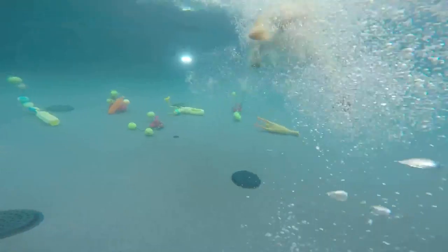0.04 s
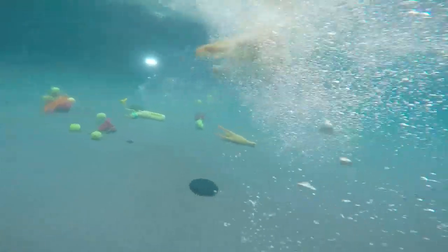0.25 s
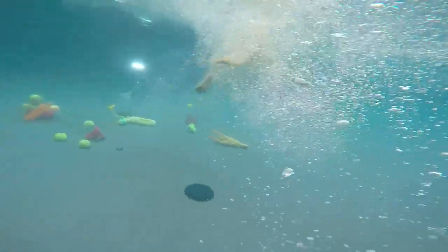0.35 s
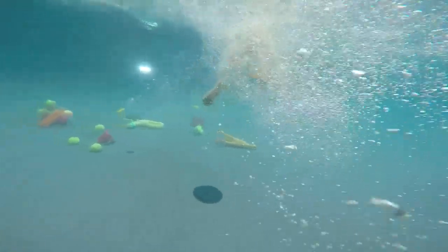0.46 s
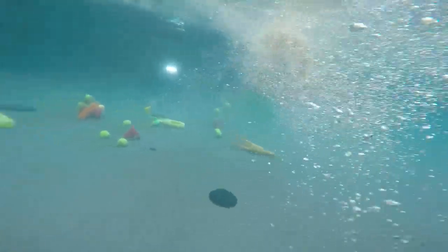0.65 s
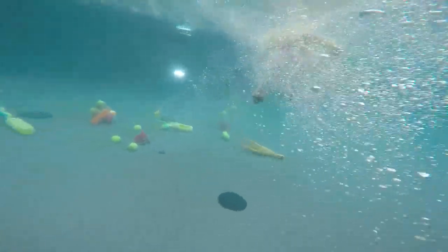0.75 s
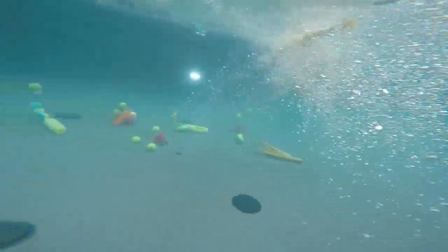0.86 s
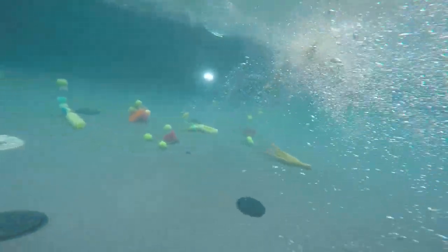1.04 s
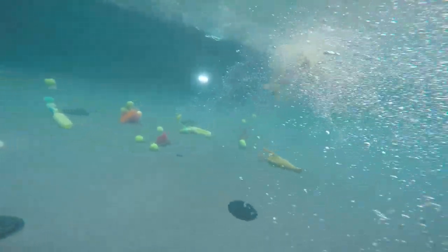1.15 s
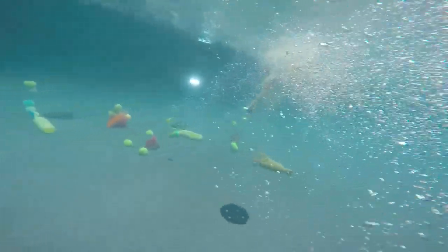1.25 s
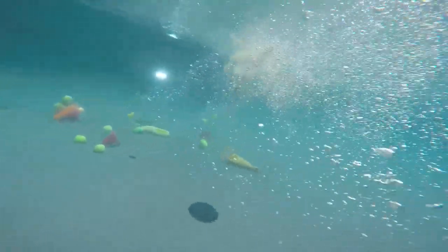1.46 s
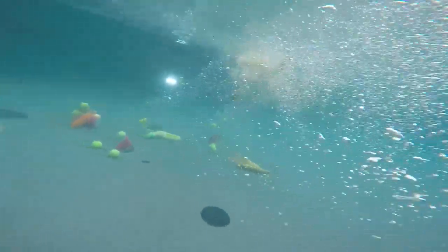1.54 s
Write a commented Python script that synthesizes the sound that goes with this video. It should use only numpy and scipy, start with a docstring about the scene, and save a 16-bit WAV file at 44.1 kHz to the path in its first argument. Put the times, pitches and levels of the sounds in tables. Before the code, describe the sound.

After a brief silence, two or three heavy bass thuds hit close to a submerged camera with a short crackle of spray, then drop away to faint gurgling bubbles, thin hiss and low water rumble in a pool.

```python
"""A dog plunges into a swimming pool, heard by a camera under water.
Air pockets heave with deep thumps, sinking sines, and surges knock on the camera housing as damped sines.
Spits of spray crack as short noise bursts, and single bubbles ring as wobbling sines with pool echoes.
Random pops, hiss and a swarm of rings, coloured by the housing, make the cloud's wash and fizz.
Slow currents rumble on the housing as low coloured noise."""
import sys
import numpy as np
from scipy import signal
from scipy.io import wavfile
from scipy.ndimage import uniform_filter1d

SR = 44100
rng = np.random.default_rng(int(sys.argv[2]) if len(sys.argv) > 2 else 0)


def unload_wav(signal):
    """Save mono or channel-first audio to the path in sys.argv[1] as 16-bit WAV at rate SR, clipped to [-1, 1]."""
    wavfile.write(
        sys.argv[1],
        SR,
        np.round(np.clip(np.atleast_2d(signal).T, -1, 1) * 32767).astype(np.int16),
    )


N = 70560  # 1.6 s

# colour of the bubble cloud heard through the resonant housing: pitch_hz, relative density_db [dB per Hz]
CLOUD_COLOUR = [(100, -19), (200, -8), (300, -4.5), (450, -3.5), (590, 2), (690, -6), (800, -13.5),
                (920, -13.5), (1050, -12), (1230, -7.5), (1400, -22), (1570, -12.5), (1680, -14),
                (1830, -8), (2050, -21.5), (2480, -17.5), (2750, -23.5), (3220, -19), (3550, -26),
                (3780, -23), (4000, -14.5), (4400, -15.5), (4580, -21.5), (4950, -22), (5700, -29.5),
                (7000, -34), (8300, -34.5), (12000, -41), (15000, -45)]


def gain_of(db):
    """Decibels to gain."""
    return 10 ** (np.asarray(db) / 20)


def evened(x):
    """Scales to unit rms."""
    return x / np.sqrt(np.mean(x ** 2) + 1e-20)


def add(mix, start_s, sound):
    """Mixes a sound in at its start time, cut at the end of the scene."""
    part = mix[max(round(start_s * SR), 0):][:len(sound)]
    part += sound[:len(part)]


def level(points):
    """Gain along a level curve, silent until the sound cuts in, opening within a millisecond."""
    cut_in_s, rise_s = 0.0899, 0.001
    t = np.arange(N) / SR
    times_s, levels_db = np.transpose(points)
    opening = np.clip((t - cut_in_s) / rise_s, 0, 1)
    return gain_of(np.interp(t, times_s, levels_db)) * opening


def colour(x, points):
    """Causal minimum-phase filter with the given spectrum, so that clicks ring in its peaks."""
    points_hz, points_db = np.transpose(points)
    bins_hz = abs(np.fft.fftfreq(N, 1 / SR)) + 1  # 1 Hz up, to keep the logarithm finite
    log_gain = np.log(gain_of(np.interp(np.log(bins_hz), np.log(points_hz), points_db)))
    response = np.exp(np.conj(signal.hilbert(log_gain)))
    return np.fft.ifft(np.fft.fft(x) * response).real


def pool(x):
    """Adds a short scatter of decaying echoes from the surface and floor."""
    echo_db, t60_s, echoes_per_s = -9.5, 0.12, 2000
    t = np.arange(SR // 4) / SR
    strikes = rng.standard_normal(len(t)) * (rng.random(len(t)) < echoes_per_s / SR)
    taps = strikes * gain_of(-60 * t / t60_s)
    echoes = signal.fftconvolve(x, taps / np.linalg.norm(taps))[:N]
    return x + gain_of(echo_db) * echoes


def currents():
    """Stirred water pushes slowly on the housing: low noise, evened over about 90 ms."""
    # spectrum of the push: pitch_hz, relative density_db [dB per Hz]
    rumble_colour = [(8, -5), (22, 10), (36, 2), (60, -3.5), (100, -9.5), (170, -19.5), (400, -46.5)]
    # strength of the push: time_s, rms level_db
    rumble_level = [(.09, -51), (.3, -49.5), (.4, -58.5), (.55, -54.5), (.68, -53.5), (.76, -53),
                    (.82, -51.5), (.9, -55), (1.03, -54.5), (1.11, -47), (1.17, -54.5), (1.36, -51),
                    (1.45, -50), (1.6, -48.5)]
    push = colour(rng.standard_normal(N), rumble_colour)
    push /= np.sqrt(uniform_filter1d(push ** 2, size=4000))
    return push * level(rumble_level)


def swarm():
    """Many bubbles of random size, each ringing for a few cycles through the housing."""
    count, low_hz, high_hz = 400, 300, 3400
    decay_cycles, spread_db = 6.7, 4.5
    out, t = np.zeros(N), np.arange(SR // 12) / SR
    for when, size, strength in rng.random((count, 3)):
        hz = low_hz * (high_hz / low_hz) ** size
        shape = (1 - np.exp(-hz * t)) * np.exp(-hz * t / decay_cycles)
        ring = shape * np.sin(2 * np.pi * hz * t)
        add(out, when * N / SR, hz * gain_of(spread_db * strength ** 2) * ring)
    return evened(colour(out, CLOUD_COLOUR))


def pops(per_s, spread_db, share):
    """Random pops of uneven size over the hiss of countless smaller ones; share is the pops' power."""
    sizes = gain_of(spread_db * np.minimum(rng.exponential(1, N), 4)) * rng.choice([-1, 1], N)
    near = evened(sizes * (rng.random(N) < per_s / SR))
    hiss = rng.standard_normal(N)
    return np.sqrt(share) * near + np.sqrt(1 - share) * hiss


def cloud():
    """The bubble cloud: a muffled wash with the swarm in it, and a treble fizz with pool echoes."""
    # strength of the wash: time_s, level_db
    wash_level = [(.09, -41), (.12, -43), (.17, -49), (.25, -47), (.32, -54), (.42, -55.5), (.6, -58),
                  (.7, -50.5), (.8, -56), (.92, -55.5), (1.02, -56.5), (1.3, -56.5), (1.6, -55)]
    # strength of the treble fizz: time_s, level_db
    fizz_level = [(.09, -54.5), (.16, -58.5), (.25, -59.5), (.32, -62.5), (.5, -64.5), (.7, -61), (.9, -62),
                  (1.2, -62), (1.6, -61)]
    split_hz, swarm_db = 1846, -2.5  # swarm level is relative to the popping wash
    low = signal.butter(4, split_hz, "low", fs=SR, output="sos")
    high = signal.butter(4, split_hz, "high", fs=SR, output="sos")
    wash = signal.sosfilt(low, colour(pops(per_s=820, spread_db=5, share=0.47), CLOUD_COLOUR))
    fizz = signal.sosfilt(high, colour(pops(per_s=2900, spread_db=9.5, share=0.2), CLOUD_COLOUR))
    wash = evened(wash) + gain_of(swarm_db) * swarm()
    return evened(wash) * level(wash_level) + evened(pool(fizz)) * level(fizz_level)


def bubble(hz, level_db, t60_s):
    """A bubble pinches off, holds and rings out, wobbling and rising slightly in pitch."""
    rise_s, hold_share = 0.0036, 0.092  # hold, rise included, as a share of t60
    glide_per_s = 0.45  # pitch rise as a share of the starting pitch
    wobble_depth, wobble_share = 0.22, 0.07  # wobble bandwidth as a share of the pitch
    t = np.arange(SR // 4) / SR
    fade_db = 60 * np.maximum(t / t60_s - hold_share, 0)
    shape = np.minimum(t / rise_s, 1) * gain_of(level_db - fade_db)
    smooth = signal.butter(2, np.clip(wobble_share * hz, 5, 2000), fs=SR, output="sos")
    wobble = evened(signal.sosfilt(smooth, rng.standard_normal((2, len(t)))))
    in_phase, sideways = wobble_depth * wobble
    turn = 2 * np.pi * hz * (t + glide_per_s * t ** 2 / 2)
    ring = (1 + in_phase) * np.sin(turn) + sideways * np.cos(turn)
    return shape * ring / np.sqrt(1 + 2 * wobble_depth ** 2)


def bubbles():
    """Single bubbles ring out in the pool, with echoes from its surface and floor."""
    # bubbles pinching off: start_s, starting pitch_hz, level_db before echoes, t60_s of the fade after the hold
    bubble_rows = [(.098, 1186, -43, 0.081), (.147, 1112, -41.5, .04), (.173, 615, -42, 0.11),
                   (.212, 1210, -44, 0.048), (.282, 1234, -47, 0.051), (.312, 686, -47, .07),
                   (.385, 601, -43, 0.037), (.530, 2613, -54.5, 0.032), (.574, 345, -45.5, 0.065),
                   (.645, 552.5, -39, 0.053), (.645, 1243, -45, 0.063), (.678, 2850, -44.5, 0.022),
                   (.681, 2465, -48, .03), (.690, 589, -38, 0.073), (.701, 1940, -45, 0.03),
                   (.718, 578, -41.5, 0.055), (.725, 737, -37.5, 0.027), (.778, 2200, -50.5, 0.029),
                   (.778, 1187, -45.5, 0.027), (.788, 586, -38.5, 0.057), (.800, 1570, -50.5, 0.064),
                   (.852, 1027, -48.5, 0.063), (.874, 1142, -49, 0.062), (.893, 1186, -45.5, 0.053),
                   (.897, 584, -47, 0.057), (.958, 1830, -51.5, 0.039), (1.044, 237, -46, 0.14),
                   (1.117, 390, -47.5, .06), (1.15, 416, -47.5, 0.047), (1.211, 648, -48, 0.043),
                   (1.212, 1735, -50.5, 0.041), (1.266, 522, -40.5, 0.038), (1.295, 1196, -48, 0.044),
                   (1.384, 569, -48.5, 0.036), (1.489, 404, -47.5, 0.064), (1.495, 1847, -54, 0.05),
                   (1.547, 1180, -47.5, 0.027), (1.594, 560, -42, .05)]
    rings = np.zeros(N)
    for start_s, hz, level_db, t60_s in bubble_rows:
        add(rings, start_s, bubble(hz, level_db, t60_s))
    return pool(rings)


def cracks():
    """Short bright spits of spray: coloured noise that starts at once and decays."""
    # spits: start_s, starting level_db, decay_s [time constant]
    spit_rows = [(.230, -48.5, 0.0066), (.2393, -44.5, 0.0026), (0.248, -47.5, .004), (0.266, -53.5, .007),
                 (.843, -51, 0.0011)]
    # spectrum of the spray: pitch_hz, relative density_db [dB per Hz]
    spray_colour = [(500, 7), (2500, -1.5), (6000, -4), (15000, -16.5)]
    spits, t = np.zeros(N), np.arange(SR // 20) / SR
    for start_s, level_db, decay_s in spit_rows:
        add(spits, start_s, gain_of(level_db) * np.exp(-t / decay_s))
    return spits * evened(colour(rng.standard_normal(N), spray_colour))


def knock(hz, level_db, t60_s):
    """A dull, quickly damped blow on the housing, with the thud of its echoes."""
    rise_s, thud_db, thud_t60_s = 0.001, -23, 0.12
    t = np.arange(SR // 8) / SR
    shape = gain_of(level_db - 60 * t / t60_s) * (1 - np.exp(-t / rise_s))
    blow = -shape * np.sin(2 * np.pi * hz * t)
    taps = rng.standard_normal(len(t)) * gain_of(-60 * t / thud_t60_s)
    thud = signal.fftconvolve(blow, taps / np.linalg.norm(taps))[:len(t)]
    return blow + gain_of(thud_db) * thud


def knocks():
    """Surges of water knock on the housing."""
    # surges: start_s, pitch_hz, level_db before the rise softens it, t60_s
    knock_rows = [(0.0939, 135, -21, .05), (0.165, 230, -31, .03), (0.2123, 84.8, -2.5, 0.034),
                  (0.2278, 95, -6, 0.034), (0.2391, 400, -8.5, 0.011), (0.73, 172, -46.5, 0.055),
                  (0.814, 255, -46, 0.058), (0.943, 240, -43.5, 0.038), (1.383, 80, -41.5, 0.077),
                  (1.407, 170, -49.5, 0.048)]
    blows = np.zeros(N)
    for start_s, hz, level_db, t60_s in knock_rows:
        add(blows, start_s, knock(hz, level_db, t60_s))
    return blows


def thump(swell_s, hz, level_db, decay_s, sag_s, curve):
    """An air pocket swells into a deep throb and dies away, its pitch sinking from the start."""
    low_share = 0.29  # share of the starting pitch that it sinks towards
    t = np.arange(SR // 4) / SR
    pitch = hz * (low_share + (1 - low_share) * np.exp(-(t / sag_s) ** 2))
    swell = np.minimum(t / swell_s, 1) ** curve
    decay = np.exp(-np.maximum(t - swell_s, 0) / decay_s)
    shape = uniform_filter1d(swell * decay, size=150)  # rounds corners over 3.4 ms
    return -gain_of(level_db) * shape * np.sin(2 * np.pi * np.cumsum(pitch) / SR)


def thumps():
    """Pockets of air heave in the water with deep thumps."""
    # pockets: start_s, swell_s, starting pitch_hz, level_db before rounding, decay_s [time constant],
    # sag_s [time scale of the pitch fall], curve [power of the swell]
    thump_rows = [(0.0934, 0.029, 61.1, -4.5, 0.011, 0.047, 0.38),
                  (.162, 0.0404, 70.3, -6.5, 0.024, 0.03, 1.15),
                  (.228, 0.01503, 54.47, -0.08, 0.015, 0.02094, 0.27),
                  (1.467, 0.031, 30.2, -31.5, 0.033, 0.051, 0.39),
                  (1.56, 0.0094, 40.5, -30, 0.023, 0.017, 0.93)]
    heaves = np.zeros(N)
    for start_s, *settings in thump_rows:
        add(heaves, start_s, thump(*settings))
    return heaves


def scene():
    """Currents, cloud and bubbles in the pool, with spray, knocks and thumps close by."""
    surroundings = currents() + cloud() + bubbles()
    close_by = cracks() + knocks() + thumps()
    return (surroundings + close_by)[None]


def record(dry):
    """The camera rounds off the loudest peaks, then limits the band."""
    knee, room, edge_hz = 0.93, 0.01, 15250  # rounding starts at the knee and ends within the room above
    held = np.clip(dry, -knee, knee)
    rounded = held + room * np.tanh((dry - held) / room)
    band = signal.firwin(511, edge_hz, window=("kaiser", 9), fs=SR)
    return signal.oaconvolve(rounded, band[None], "same")


dry = scene()
out = record(dry)
unload_wav(out)
```